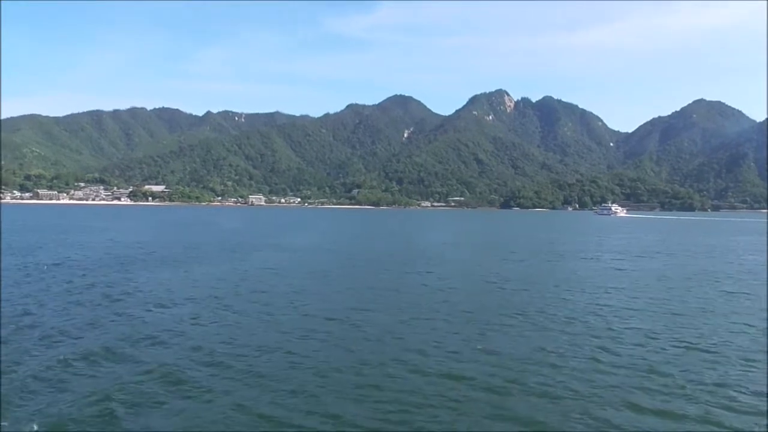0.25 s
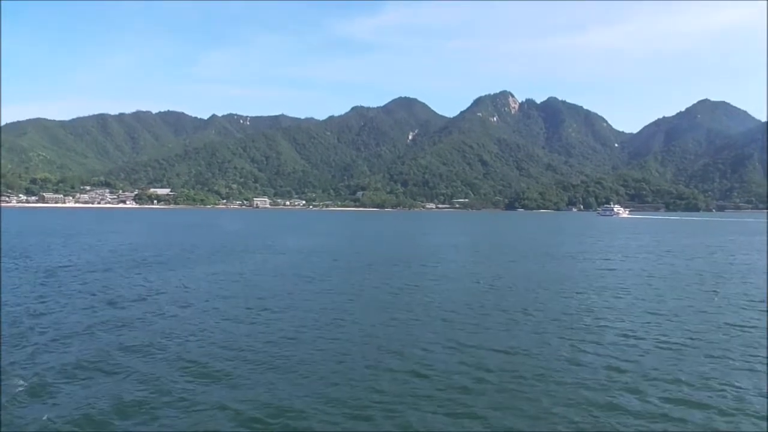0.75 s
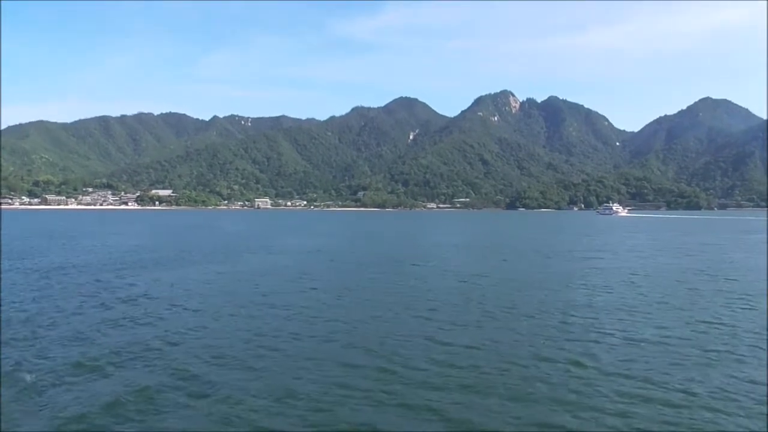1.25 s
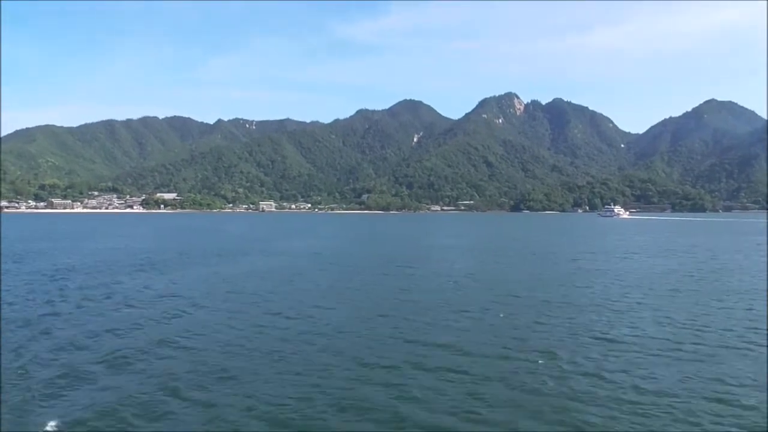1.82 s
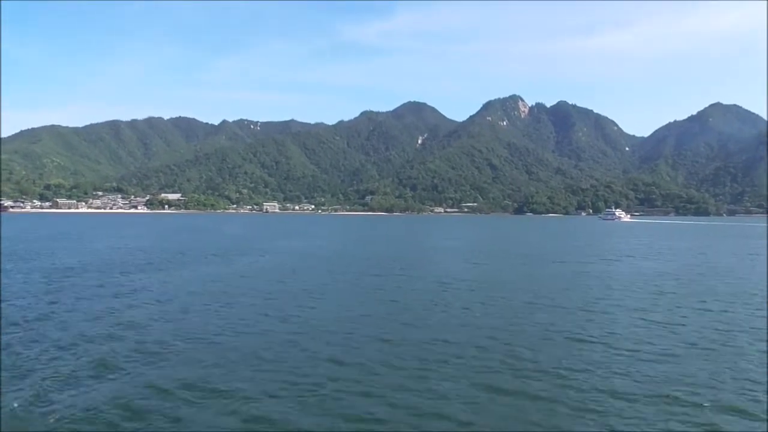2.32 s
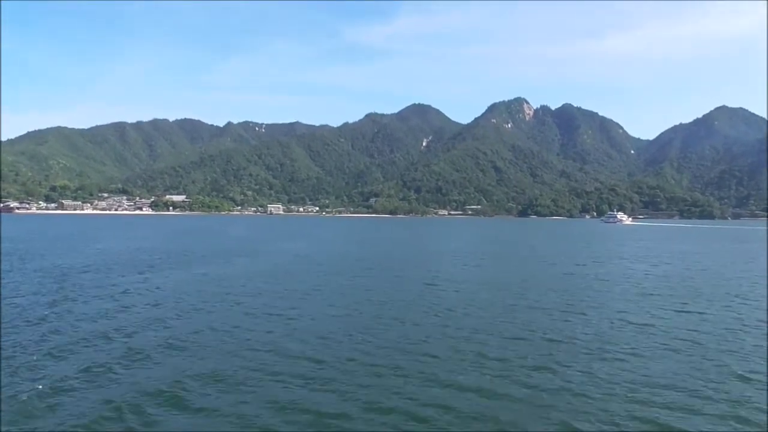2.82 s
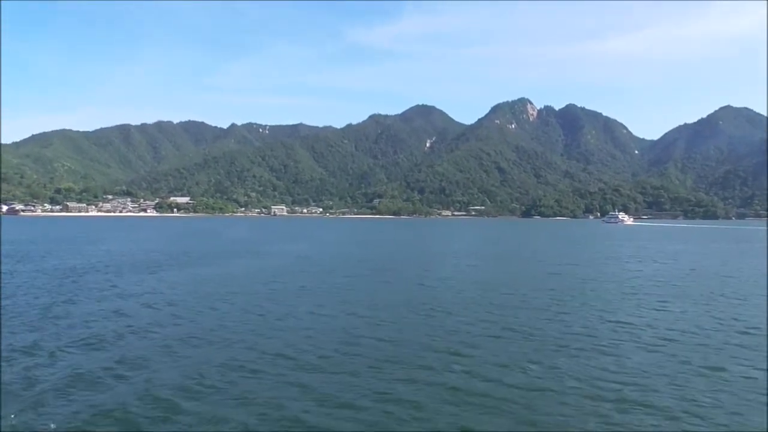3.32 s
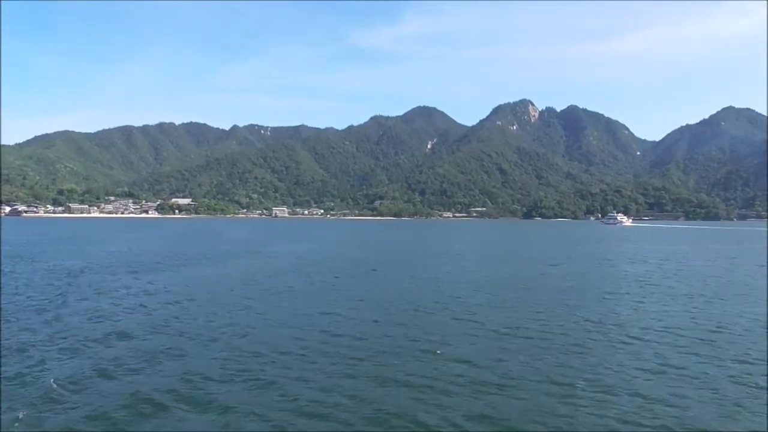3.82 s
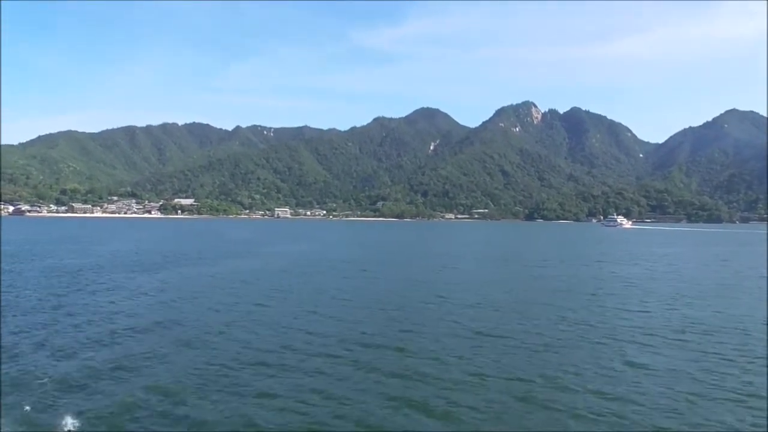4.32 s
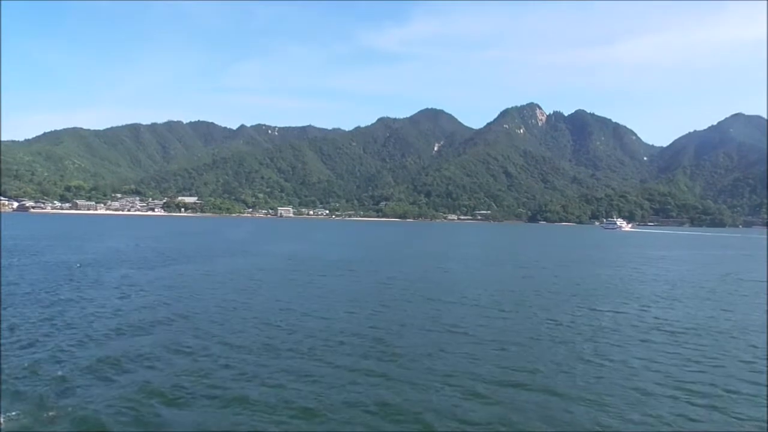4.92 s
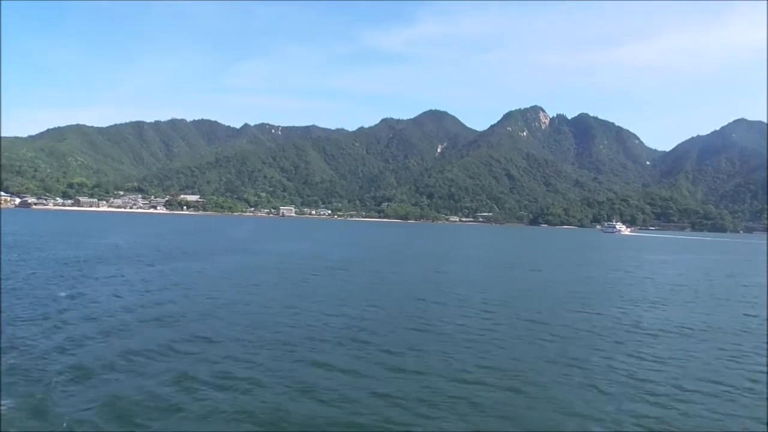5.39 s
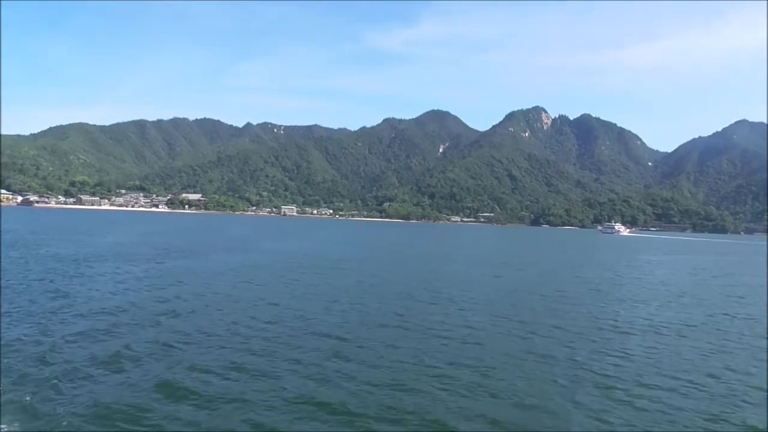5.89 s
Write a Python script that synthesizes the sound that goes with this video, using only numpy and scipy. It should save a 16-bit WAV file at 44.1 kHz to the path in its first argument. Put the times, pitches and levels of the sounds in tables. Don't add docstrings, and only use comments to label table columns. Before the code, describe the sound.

On the open deck of a moving ferry, wind batters a small camera microphone without pause. Deep fluttering rumble breaks into quick puffs, dull slaps and tiny bright spits of air. Far quieter underneath are a low hull roar, a faint diesel hum and the thin hiss of foam along the side. The stereo image narrows abruptly in gusts, then slowly widens.

```python
import sys
import numpy as np
from scipy import signal
from scipy.fft import rfft, irfft
from scipy.io import wavfile
from scipy.ndimage import uniform_filter1d

SR = 44100
rng = np.random.default_rng(int(sys.argv[2]) if len(sys.argv) > 2 else 0)


def natural_amplitude(level_db):
    exponent = np.asarray(level_db, float) / 20
    return 10 ** exponent


def log_audio(samples):
    frames = np.atleast_2d(samples).T
    limited = np.clip(frames, -1, 1)
    pcm = np.round(limited * 32767).astype(np.int16)
    wavfile.write(sys.argv[1], SR, pcm)


N = 271215

# time in seconds, wind strength in dB, swell against the hull in dB,
# propeller load in dB.
WEATHER = [(0, -0.5, -2, -5), (.3, -2, 0.5, -1), (.55, 2.5, -0.5, -3.5), (.8, 2, -1.5, -1.5),
           (1.2, 0.5, -2.5, -5.5), (1.7, 1, -1.5, -1), (2.1, 0.5, 0, -1.5), (2.5, -2, 1, -1),
           (2.8, 0.5, 2.5, 0), (3.1, 1.5, 0, 6), (3.6, 0.2, 0, -2.5), (4.05, -1.9, -0.5, -0.5),
           (4.3, -1, 2, 2), (4.55, 3, -0.5, -1), (4.9, -0.3, -1, -3.5), (5.35, -1.5, 1.5, 1.5),
           (5.8, 1.5, 1, 0), (6.15, 0.5, 2, 2.5)]

# peak time in seconds, rumble rise in dB, rasp rise in dB, half length in ms.
PUFFS = [(0.225, 3.5, 5, 12), (0.297, 2.5, 2.5, 140), (0.497, 2, 1.5, 38), (0.587, -0.3, 2.5, 58),
         (0.946, 0, 2, 63), (1.016, -1, 4.5, 20.0), (1.151, 2.5, 4, 56), (1.287, 2.5, 1, 230),
         (1.6, 5, 5, 17), (1.83, 3, 3, 106), (2.015, 5, 3, 24), (2.189, 5, 1.5, 26), (2.263, 5, 2, 16),
         (2.409, 5, 1, 27), (2.686, 3, 3.5, 13), (2.836, -0.5, 2, 43), (2.913, 6, -4, 18),
         (3.293, 3.5, 2, 32), (3.468, 3, 2, 22), (3.791, 4.5, 1.5, 52), (3.917, 5.5, 2.5, 80),
         (4.306, 7.5, 5.9, 10.5), (4.382, 0, 1.5, 31), (4.729, 2, 5.5, 18), (5.168, 4, 1, 31),
         (5.356, 5.5, 4, 61), (5.494, 7.5, 2, 26), (5.659, 5, 2, 16), (5.729, 3.5, 4.5, 23),
         (5.978, 1, 2, 45)]
# centre time in seconds, rumble change in dB, rasp change in dB, half length in ms.
LULLS = [(0.042, -6, -2, 18), (0.122, -3, -2, 25), (0.397, -4.5, -7, 17), (0.746, -4.5, -1, 47),
         (0.848, -2.5, -5.5, 26), (1.101, -3, -5, 27), (1.231, -5.5, -1, 59), (1.656, 0.5, -0.5, 87),
         (2.141, -2.5, -1, 41), (2.373, -5.5, -8, 14), (2.552, 0, -8, 18), (2.638, -1, -4.5, 39),
         (2.949, -2.5, -5, 15), (3.348, -3, -0.5, 41), (3.432, -4, -1.5, 28.0), (3.698, -1.5, -2, 26),
         (3.983, -3.5, -4.5, 27), (4.169, -9, -6, 21), (4.52, -1.5, -4, 34), (4.971, -1.5, -4, 15),
         (5.254, -2, 1, 84), (5.593, -2, -4.5, 45), (5.789, -5.5, -10.5, 56), (5.919, -1.5, -3.5, 46)]
# peak time in seconds, rise in dB.
FLICKS = [(0.278, 3), (0.321, 4.5), (0.419, 2), (0.684, -0.5), (0.808, 2.5), (1.199, 2), (1.271, 2.5),
          (1.327, 2), (1.397, 2.5), (1.476, 4), (2.103, 1.5), (2.221, 1), (2.522, 1), (2.76, -0.5),
          (3.079, 2.5), (3.583, 3.5), (4.031, 3.5), (4.069, 2.5), (4.123, 2), (4.194, 2), (4.228, 2),
          (4.562, 1), (4.6, 1), (4.901, 1), (5.094, 2.8), (5.224, 1.5), (5.417, 2.5), (5.579, 2),
          (5.782, 7), (6.09, 3)]
FLICK_MS = 16
PUFF_GAIN, LULL_GAIN, FLICK_GAIN = (0.87, 1.05), (1.48, 0.88), (0.96, 1.3)

# frequency in Hz, level in dB per Hz.
RUMBLE = [(76, -33), (130, -8.5), (199, -0.5), (264, 0.5), (328, -0.5), (609, -11.5), (1020, -24),
          (1360, -27), (1750, -41.5), (2280, -41), (3850, -120)]
# frequency in Hz, level in dB per Hz.
RASP = [(880, -43), (1500, -4), (1760, -8.5), (2180, -6), (2930, -11), (3610, -9.5), (6200, -18.5),
        (8060, -21), (13600, -120)]
RUMBLE_DB, RASP_DB = -21, -49
RASP_PER_WIND, RASP_PER_SWELL = 0.55, 0.77
BILLOW_PER_DB = 0.3253

# time in seconds, peak in dB.
SLAPS = [(0.096, -13), (0.224, -13), (0.324, -23), (0.418, -11), (0.447, -15), (0.596, -8), (0.806, -21),
         (0.887, -9.5), (0.953, -21), (1, -9.5), (1.124, -17), (1.253, -22), (1.278, -13), (1.309, -7),
         (1.421, -22), (1.546, -18), (1.591, -14), (1.72, -22), (2.152, -16), (2.216, -18), (2.257, -22),
         (2.309, -9.5), (2.342, -9.5), (2.643, -16), (2.726, -28), (2.82, -18), (2.927, -21), (2.985, -6.5),
         (3.068, -17), (3.147, -24), (3.179, -23), (3.279, -17), (3.578, -26), (3.705, -18), (3.786, -11),
         (3.861, -38), (4.067, -10), (4.199, -12.5), (4.414, -14), (4.524, -13), (4.593, -16), (4.697, -31),
         (4.716, -18), (4.863, -9.5), (4.983, -24), (5.045, -21), (5.326, -14), (5.416, -15), (5.654, -31),
         (5.715, -20), (5.74, -10), (5.819, -14), (5.913, -19), (5.981, -19), (6.041, -15), (6.102, -12)]
# frequency in Hz, level in dB.
SLAP_COLOUR = [(90, -29), (220, -5), (420, 3.5), (750, -12), (1300, -31), (2400, -41), (5000, -42)]
SLAP_DB, SLAP_LAG_S = -1, 0.00255
HUSH_DB, HUSH_LEAD_S, HUSH_MS = -2, 0.0062, 6.1

# time in seconds, peak in dB, half length in ms.
SPITS = [(0.2688, -33, 14), (0.3022, -33, 14), (0.4125, -39, 14), (0.4863, -29, 14), (0.5906, -34, 14),
         (0.9253, -33, 14), (1.1298, -34, 14), (1.3199, -34, 14), (1.5903, -31, 14), (1.7539, -35, 14),
         (1.8487, -36, 14), (1.9145, -36, 14), (2.0532, -33, 14), (2.1755, -32, 14), (2.3426, -40, 14),
         (2.3945, -35, 14), (2.5122, -34, 14), (2.6748, -34, 14), (2.825, -32, 14), (2.9038, -33, 14),
         (3.1438, -31, 14), (3.2705, -33, 14), (3.4595, -33, 14), (3.5079, -33, 14), (3.7988, -32, 14),
         (3.8776, -36, 14), (3.9434, -32, 14), (4.0622, -37, 14), (4.1135, -37, 14), (4.2961, -31, 14),
         (4.368, -29, 14), (4.5565, -37, 14), (4.593, -30, 14), (4.6399, -35, 14), (4.6713, -39, 14),
         (4.7172, -38, 14), (4.8015, -34, 14), (4.9836, -33, 14), (5.1612, -32.5, 14), (5.2744, -31, 14),
         (5.3328, -34, 14), (5.4819, -32, 14), (5.8187, -37, 14), (5.9489, -36, 14)]
# frequency in Hz, level in dB per Hz.
SPIT_COLOUR = [(1200, -30), (1900, -1), (2500, 3), (3500, -1), (4800, -6), (6200, -25)]
SPIT_DB, SPIT_LAG_S = -15.5, 0.0066

# frequency in Hz, level in dB per Hz.
WASH = [(2940, -11), (5000, -2), (5600, -4.5), (6200, -4), (6900, -0.5), (7860, 1), (10500, -1),
        (12000, -5.5), (13400, -13), (14800, -16), (15700, -23)]
# centre time in seconds, rise in dB, half length in ms.
SURGES = [(.03, 1.5, 78), (.25, 1.5, 90), (.45, 1, 70), (.65, -4, 67), (1.12, 4, 75), (1.65, -2.5, 70),
          (1.9, -1.5, 90), (2.35, -1.5, 60), (2.65, 3, 60), (2.84, 3.5, 60), (3.7, -2, 50), (3.85, 1, 120),
          (3.98, -3, 36), (4.12, 0, 90), (4.55, -2, 70), (4.7, 0.5, 70), (5.13, -3, 84), (5.45, -1, 55),
          (5.6, 0.5, 70), (5.8, -2.5, 80)]
WASH_DB = -49.5

# frequency in Hz, level in dB per Hz.
HULL = [(12, -40), (20, -27), (32, -24), (62, -11), (80, -6), (110, -3), (150, -1), (200, -11.5),
        (330, -120)]
HULL_DB, HULL_WANDER_DB = -32.5, 3

# multiple of the firing rate, level in dB.
ORDERS = [
    (2, -46),
    (3, -40),
]
FIRING_HZ = 31.95
HUM_PER_LOAD = 0.55

# frequency in Hz, level in dB per Hz.
UNDERTOW = [(10, -20), (25, -10), (34, -2), (45, 0.1), (60, -20)]
UNDERTOW_DB = -60

# centre time in seconds, rise in dB, half length
# in ms.
ROLLS = [(.12, -6, 140), (.25, -1.5, 50), (.55, 3.5, 120), (.75, -2, 90), (.95, 0, 80), (1.13, 2.5, 35),
         (1.4, -10, 44), (1.93, -0.5, 55), (2.06, -4, 88), (2.5, 5, 49), (2.7, 7, 78), (2.83, 5, 49),
         (2.97, 4, 50), (3.15, 1, 70), (3.32, -5.5, 81), (3.5, -1, 87), (3.75, -1.5, 80), (4.05, 2.5, 52),
         (4.2, 3, 46), (4.65, -2, 74), (4.9, 4.5, 46), (5.2, 1.5, 80), (5.43, 0, 34), (5.52, 0, 40),
         (5.8, -0.5, 76), (6.0, 5.5, 60)]
# frequency in Hz, share in dB.
DEEP = [(12, 0.1), (190, 0), (300, -19), (500, -53)]
# centre time in seconds, rise in dB, half length in ms.
HEAVES = [(.1, -2, 60), (.35, 4, 60), (.55, 3, 120), (.8, -3.5, 88), (1.05, -2, 70), (1.3, 0, 80),
          (1.55, -3, 70), (1.75, -2, 80), (2.0, -3, 77), (2.25, 1.5, 87), (2.5, -2.5, 79), (2.8, 1.5, 90),
          (3.05, 1.5, 88), (3.2, -4, 60), (3.4, 0, 70), (3.65, 3, 50), (3.9, -.7, 70), (4.15, 3, 94),
          (4.4, 3, 60), (4.65, -9, 76), (4.85, 5.5, 78), (5.15, 1.5, 53), (5.35, 2, 60), (5.55, 1, 70),
          (5.75, -1.5, 70), (6.0, 0.5, 70)]
# frequency in Hz, share in dB.
CHEST = [(120, -25), (170, -3.5), (230, -7.5), (300, -7), (400, -28)]
# centre time in seconds, rise in dB, half length in ms.
PATCHES = [(.05, 1.5, 73), (.3, -1.5, 60), (.55, 0, 80), (.75, -0.5, 80), (.95, 2.5, 110), (1.15, 2.5, 50),
           (1.35, 4, 60), (1.6, 1.5, 41), (1.85, 3, 80), (2.1, 0.7, 80), (2.4, 0.2, 70), (2.7, -4, 60),
           (2.95, 0.5, 70), (3.2, 0, 80), (3.45, .7, 70), (3.65, -1.5, 70), (3.85, -4, 130), (4.0, -2, 40),
           (4.2, -4, 50), (4.4, 2.5, 110), (4.5, 2.5, 83), (4.7, -4.5, 70), (4.95, 1.8, 80), (5.15, -1, 77),
           (5.4, 0, 70), (5.6, -.7, 60), (5.8, 1, 60), (6.0, 1.5, 80)]
# frequency in Hz, share in dB.
LOW_MIDS = [(330, -38), (480, -8), (700, -2.5), (1200, 1), (1700, -30)]
# centre in Hz, flicker in dB, flickers per second.
TEARS = [(200, 0.74, 14), (318, 0.9, 16), (510, 1, 14), (850, 1.3, 13), (2670, 1.25, 19), (4200, 1.1, 21),
         (7500, 0.77, 22), (12000, 1.1, 23)]

# frequency in Hz, lean to the right from 0 to 1,
# unshared part in dB.
PORTS = [(28, .001, -5), (60, 0.13, -8), (110, 0.16, -7), (250, 0.35, -15), (560, 0.39, -17),
         (1100, 0.29, -9), (2300, 0.3, -8), (4200, 0.16, -7), (8500, 0.02, -5.5), (13000, 0.4, -2.5)]
# start in seconds, length in seconds, share of the opening kept
FOLDS = [(1.08, 0.092, 0.64, .9), (1.5, 0.34, 0.38, .9), (1.84, 0.063, 0.024, .9), (2.2, .2, .7, .85),
         (2.874, 0.053, .55, 0.76), (3.046, 0.097, 0.012, 0.36), (3.19, 0.069, 0.15, 0.77),
         (3.425, 0.23, 0.13, .8), (3.594, 0.038, 0.33, 1), (3.85, 0.22, 0.99, .9), (4.27, 0.061, 0.39, .8),
         (5.423, 0.049, 0.44, .8), (5.88, 0.21, .3, .8)]
OPEN_AT_START, OPENS_PER_S = (.01, 0.7), (0.86, 2.4)
WIDEST = 0.94
TREBLE_AJAR, TREBLE_FOLLOWS = .53, 1.1


def shaped(x, points):
    hz, db = np.transpose(points)
    f = np.arange(N // 2 + 1) * SR / N + 1e-9
    gain_db = np.interp(np.log(f), np.log(hz), db, left=-120, right=-120)
    return irfft(rfft(x) * natural_amplitude(gain_db), N)


def unit(x):
    return x / np.sqrt(np.mean(np.atleast_2d(x)[0] ** 2))


def walk(rate):
    hold = int(SR / rate)
    levels = np.repeat(rng.standard_normal(N // hold + 1), hold)
    return 1.3 * uniform_filter1d(uniform_filter1d(levels, hold), hold)[:N]


def curve(table, column):
    rows = np.array(table)
    return np.interp(np.arange(N) / SR, rows[:, 0], rows[:, column])


def bells(rows, column):
    t, total = np.arange(N) / SR, np.zeros(N)
    for row in rows:
        half = row[-1] / 1000
        a, b = np.searchsorted(t, [row[0] - half, row[0] + half])
        total[a:b] += row[column] * np.cos(np.pi / 2 * (t[a:b] - row[0]) / half) ** 2
    return total


def eddies(rate, scatter_db):
    burst = rng.random((2, N)) < rate / SR
    return burst * rng.standard_normal((2, N)) * natural_amplitude(scatter_db * rng.standard_normal((2, N)))


def puffs(column):
    flicks = [(s, db, FLICK_MS) for s, db in FLICKS]
    puff_db = PUFF_GAIN[column - 1] * bells(PUFFS, column)
    lull_db = LULL_GAIN[column - 1] * bells(LULLS, column)
    flick_db = FLICK_GAIN[column - 1] * bells(flicks, column=1)
    return puff_db + lull_db + flick_db


def wind():
    flutter, small_puffs = walk(45), walk(21.88)
    strength, swell = curve(WEATHER, column=1), curve(WEATHER, column=2)
    rumble = unit(shaped(eddies(5200, scatter_db=1.17), RUMBLE))
    rasp = unit(shaped(eddies(9000, scatter_db=3.0), RASP))
    rumble_db = RUMBLE_DB + strength + puffs(column=1) + 1.05 * flutter + 0.49 * small_puffs
    rasp_db = RASP_DB + RASP_PER_WIND * strength + RASP_PER_SWELL * swell
    rasp_db = rasp_db + puffs(column=2) + 0.49 * flutter + 0.47 * small_puffs
    skirt = shaped(rumble, [(20, -40), (400, -68), (900, 4), (1750, 12.0)])
    excess_db = rasp_db - rumble_db
    follow = natural_amplitude(0.35 * (excess_db - np.mean(excess_db)))
    upper_rumble = shaped(rumble, [(250, -41), (480, 4.5), (800, 2.5), (1300, -11)])
    billow = upper_rumble * (natural_amplitude(BILLOW_PER_DB * puffs(column=2)) - 1)
    hush = bells([(s - HUSH_LEAD_S, HUSH_DB, HUSH_MS) for s, _ in SLAPS], column=1)
    large = (rumble + billow + skirt * (follow - 1)) * natural_amplitude(rumble_db + hush)
    return large + rasp * natural_amplitude(rasp_db)


def slaps():
    s, db = np.transpose(SLAPS)
    samples = ((s + SLAP_LAG_S) * SR).astype(int)
    kicks = np.zeros((2, N))
    kicks[:, samples] = natural_amplitude(db) * np.sign(rng.standard_normal((len(s), 2))).T
    single = shaped(np.eye(1, N)[0], SLAP_COLOUR)
    return shaped(kicks, SLAP_COLOUR) / single.max() * natural_amplitude(SLAP_DB)


def spits():
    size = bells([(s + SPIT_LAG_S, natural_amplitude(db), ms) for s, db, ms in SPITS], column=1)
    hiss = unit(shaped(eddies(7000, scatter_db=3.0), SPIT_COLOUR))
    return hiss * size * natural_amplitude(SPIT_DB)


def wash():
    noise = unit(shaped(rng.standard_normal((2, N)), WASH))
    upper = shaped(noise, [(8000, -26), (11000, -5.0), (16000, 0.1)])
    hiss = (noise - upper) * natural_amplitude(1.0 * walk(19)) + upper * natural_amplitude(1.1 * walk(19))
    level_db = WASH_DB + curve(WEATHER, column=2) + bells(SURGES, column=1)
    return hiss * natural_amplitude(level_db + 0.08 * puffs(column=2) + 0.38 * walk(23.9))


def hull():
    roar = unit(shaped(rng.standard_normal((2, N)), HULL))
    return roar * natural_amplitude(HULL_DB + curve(WEATHER, column=3) + HULL_WANDER_DB * walk(6))


def diesel():
    phase = 2 * np.pi * np.cumsum(FIRING_HZ * (1 + 0.0085 * walk(5))) / SR
    hum = np.zeros(N)
    for order, db in ORDERS:
        level_db = db + HUM_PER_LOAD * curve(WEATHER, column=3) + 2.3 * walk(6)
        hum += np.sqrt(2) * natural_amplitude(level_db) * np.sin(order * phase)
    return hum


def undertow():
    return unit(shaped(rng.standard_normal((2, N)), UNDERTOW)) * natural_amplitude(UNDERTOW_DB)


def rolled(x):
    out = x
    for part, rows in [(DEEP, ROLLS), (CHEST, HEAVES), (LOW_MIDS, PATCHES)]:
        out = out + shaped(x, part) * (natural_amplitude(bells(rows, column=1)) - 1)
    return out


def torn(x):
    out = x
    for hz, db, rate in TEARS:
        band = shaped(x, [(hz / 1.64, -30), (hz / 1.215, -1.5), (hz * 1.2, -1.5), (hz * 1.42, -30)])
        out = out + band * (natural_amplitude(db * walk(rate)) - 1)
    return out


def picture(column):
    step_s = .002
    t = np.arange(0, N / SR, step_s)
    shrink = np.ones(len(t))
    for fold in FOLDS:
        start, length = fold[:2]
        inside = (t >= start) & (t < start + length)
        shrink[inside] *= np.clip(fold[column], .01, 1) ** (step_s / length)
    opening = [OPEN_AT_START[column - 2]]
    for keep in shrink[1:]:
        opening.append(min(opening[-1] + OPENS_PER_S[column - 2] * step_s, WIDEST) * keep)
    return np.interp(np.arange(N) / SR, t, opening)


def scene():
    air = rolled(wind() + wash() + hull()) + slaps() + spits() + undertow()
    shared, unshared = torn(air)
    hz, lean, own_db = np.transpose(PORTS)
    ends = np.r_[10, hz, SR / 2]
    lean = np.clip(np.r_[lean[0], lean, lean[-1]], 1e-3, .9)
    leaning = shaped(shared, np.c_[ends, 20 * np.log10(lean)])
    own = shaped(unshared, np.c_[ends, np.r_[own_db[0], own_db, own_db[-1]]])
    treble = shaped(own, [(700, -30), (2500, 0.1), (SR / 2, 0.1)])
    wide = picture(column=2)
    treble_wide = np.hypot(TREBLE_AJAR, TREBLE_FOLLOWS * wide ** 2) * picture(column=3)
    side = wide * (own - treble - leaning) + treble_wide * treble
    mid = shared + diesel()
    return np.array([mid + side, mid - side])


def top_cut(x):
    return signal.sosfilt(signal.butter(12, 15640, fs=SR, output="sos"), x)


def record(dry):
    mix = np.tanh(1.5 * dry) / 1.28
    return top_cut(mix)


dry = scene()
out = record(dry)
log_audio(out)
```